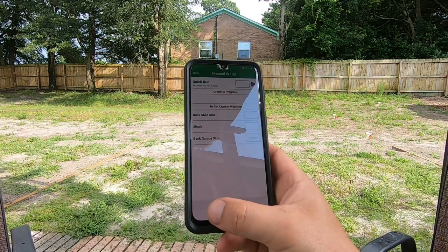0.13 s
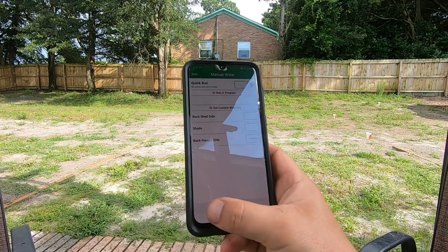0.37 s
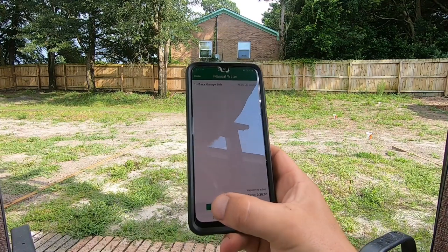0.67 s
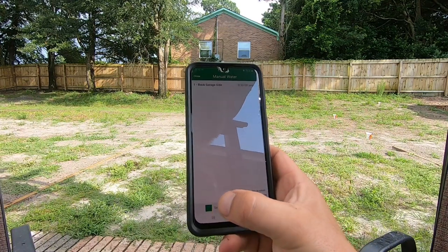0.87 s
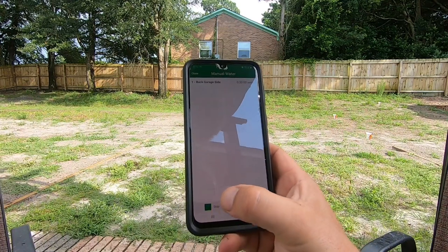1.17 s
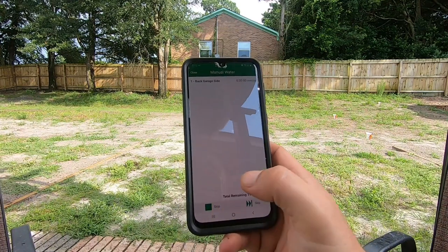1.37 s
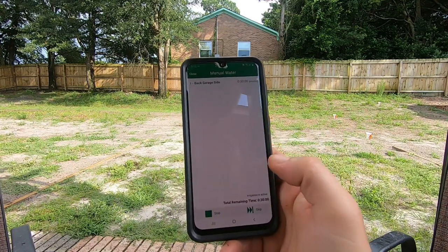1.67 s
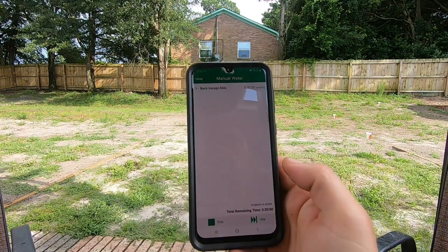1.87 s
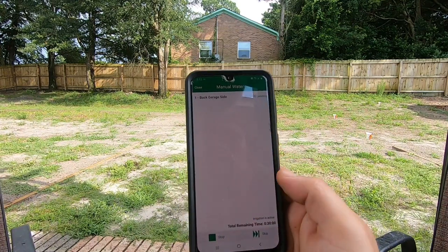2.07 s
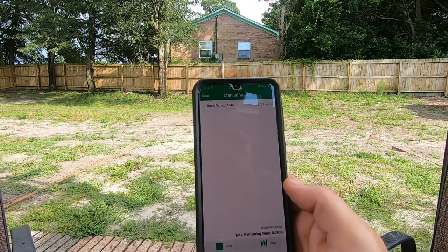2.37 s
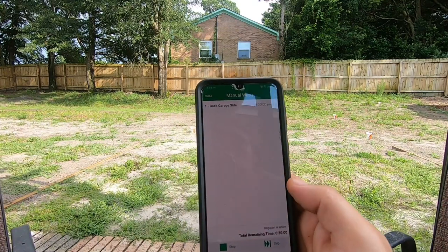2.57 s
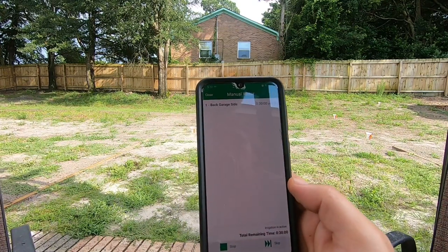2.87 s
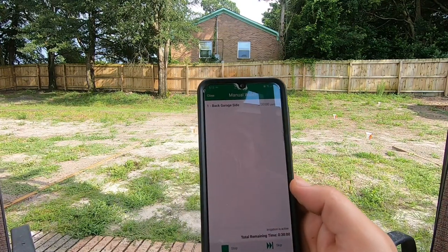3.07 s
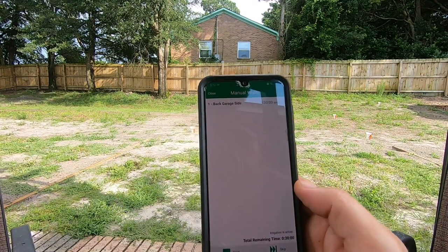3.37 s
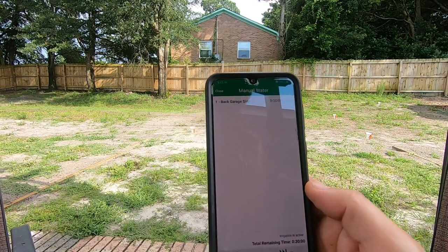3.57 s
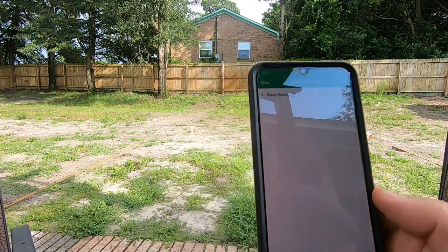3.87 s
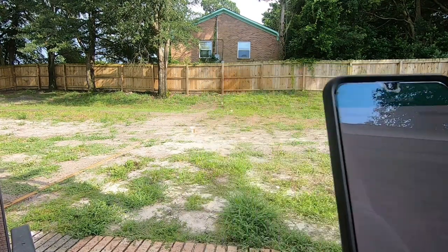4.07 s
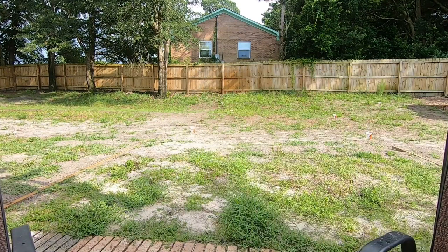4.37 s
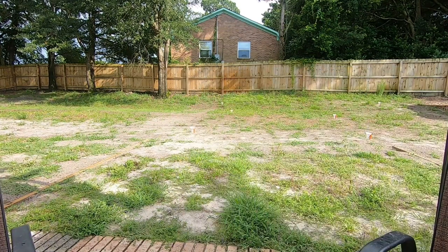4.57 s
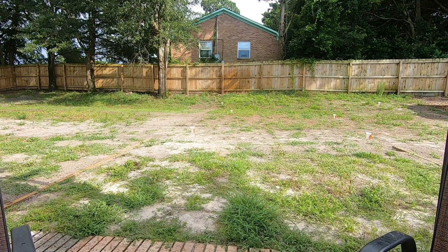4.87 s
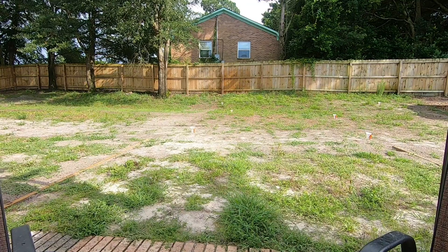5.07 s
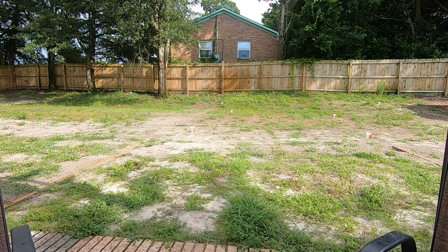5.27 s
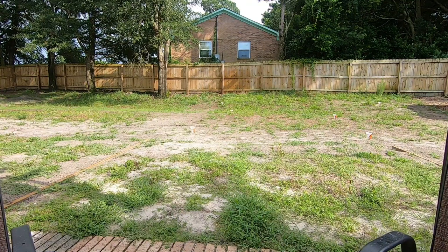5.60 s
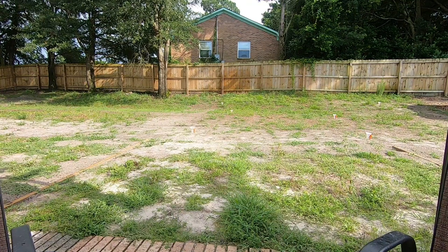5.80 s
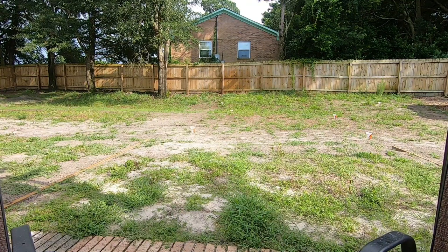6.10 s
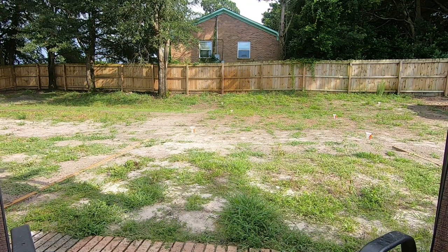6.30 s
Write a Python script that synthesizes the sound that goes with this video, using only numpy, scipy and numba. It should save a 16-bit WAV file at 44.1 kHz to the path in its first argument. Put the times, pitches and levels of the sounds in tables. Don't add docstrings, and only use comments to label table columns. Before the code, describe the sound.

Close handling sounds come first: a faint rustle, one dull knock and a tiny glassy tick. Around them lie distant motors, low road rumble, steady cicadas and slow air pushing the outdoor microphone. After a calm middle, the sprinkler line fills; airy spurts sputter from the heads with unsteady whistling, watery gulps and bright fizz, slightly echoed by fence and wall, still building when it stops.

```python
import sys
import numpy as np
from scipy import signal
from scipy.fft import rfft, irfft, next_fast_len
from scipy.io import wavfile
from scipy.ndimage import uniform_filter1d, map_coordinates
from numba import njit

SR = 44100
rng = np.random.default_rng(int(sys.argv[2]) if len(sys.argv) > 2 else 0)


def pcm_store(signal):
    levels = np.round(np.clip(np.atleast_2d(signal), -1, 1) * 32767)
    wavfile.write(sys.argv[1], SR, levels.astype(np.int16).T)


def elevation(decibels):
    levels = np.asarray(decibels, float)
    return 10 ** (levels / 20)


N = 284004

# (time [s], rumble level [dB])
TRAFFIC_LEVEL = [(0, -46), (.14, -45), (.45, -52), (.9, -47.5), (1.1, -48.5), (1.4, -47.5), (1.68, -46.5),
                 (2.1, -50), (2.5, -53), (3.5, -49), (4.09, -55), (4.6, -49.5), (5.26, -46), (5.55, -52),
                 (5.88, -45.5), (6.1, -51.5), (6.44, -48)]
# (frequency [Hz], density [dB per Hz])
TYRE_SPECTRUM = [(90, -15.5), (150, -8), (290, -12), (345, -18.5), (700, -17.5), (1100, -24), (2000, -33),
                 (3200, -41), (6000, -42)]
RUMBLE_SPECTRUM = [(18, -26), (28, -6), (45, 0), (70, -3.5), (95, -4.5), (140, -6.5), (220, -20.5)]
LEAF_SPECTRUM = [(800, -1), (2000, 0), (4000, -5.5), (6000, -7.5), (9500, -13), (11000, -11),
                 (15500, -12.5)]
TYRES_DB, TYRES_FOLLOW = -43.5, 0.14
# (time [s], level [dB])
HEAVE_LEVEL = [(0, -40), (.08, -17), (1, -19), (2, -24), (2.8, -18), (3.3, -18), (3.9, -13), (4.6, -16),
               (5.2, -21), (5.9, -14), (6.44, -24)]
# (frequency [Hz], density [dB per Hz])
HEAVE_SPECTRUM = [(.5, -12), (2.3, 0), (4.5, -13), (8, -17), (12, -27), (20, -38), (32, -52)]

# (frequency [Hz], level [dB])
FAN_LINES = [(147, -66.5), (294, -60), (441, -64)]
# (time [s], firing rate [Hz], firing level [dB], octave level [dB])
PULLING_ENGINE = [(0, 59.4, -32.5, -33.5), (.17, 60.4, -56, -28.5), (.42, 61.54, -34.5, -32.5),
                  (.56, 62.9, -35.5, -29), (.61, 64.8, -41, -51), (.68, 65.73, -37, -35.5),
                  (.95, 66.64, -54, -47.5), (1.12, 67.5, -40.5, -36.5), (1.42, 74.5, -45, -70)]
IDLING_ENGINE = [(1.9, 63.5, -52, -47.5), (2.05, 64.53, -55, -38.5), (2.62, 65.55, -42.5, -46.5),
                 (2.95, 66.5, -45, -48.5), (3.42, 67.1, -45, -47), (3.66, 65.4, -44, -44.5),
                 (3.85, 63, -42, -53), (4.05, 65, -45, -61), (4.38, 67.5, -49, -63)]
# (start [s], end [s], frequency [Hz], level [dB])
PASSING_MOTORS = [
    (1.606, 2.6, 122.4, -44.5),
    (4.95, 5.338, 120, -45),
    (5.703, 6.442, 120.6, -45.5),
]

# (start [s], level [dB])
SOLO_PULSES = [(.1, -50), (.4, -57), (.68, -47.5), (1.02, -50), (1.29, -50), (1.66, -50), (1.99, -47),
               (2.3, -50.5), (2.64, -52), (3.05, -49), (3.4, -52), (3.82, -50), (4.19, -45.5), (4.5, -56),
               (4.76, -50.5), (5.1, -52), (5.42, -52.5), (5.62, -61), (5.93, -56)]
GROUP_PULSES = [(.12, -52), (.45, -52), (.95, -51), (1.27, -51), (1.53, -50), (1.82, -48), (2.12, -52),
                (2.38, -53.5), (2.63, -50), (2.85, -49.5), (3.0, -52), (3.28, -50.5), (3.6, -54),
                (3.83, -51), (4.14, -53), (4.47, -54), (4.75, -52), (5.35, -54), (5.7, -63), (6.15, -57)]
# (frequency [Hz], density [dB per Hz])
CHOIR_SPECTRUM = [(4240, -51), (7200, 0.5), (7400, -0.5), (8670, 1.5), (9720, -8.5), (10500, -17),
                  (13600, -54), (22000, -120)]

# (time [s], level [dB])
RUSTLE_LEVEL = [(.12, -52.5), (.155, -54), (.18, -42.5), (.225, -48.5), (.256, -56), (.3, -54)]
# (frequency [Hz], density [dB per Hz])
CLOTH_SPECTRUM = [(400, -2.5), (800, -2.5), (1400, -8), (2000, -6.5), (3000, -16), (4600, -14.5),
                  (6000, -15), (8500, -16), (10500, -31)]
# (time [s], peak level [dB], frequency [Hz], t60 [s])
KNUCKLE = [
    (.183, -21, 797, 0.021),
    (0.196, -40, 940, 0.041),
]
# (time [s], peak level [dB])
NAIL_TICK = [
    (0.741, -27),
]
# (frequency [Hz], level [dB], t60 [s])
GLASS_MODES = [(6210, 8, 0.018), (5640, -2, 0.022), (5530, -12, 0.022)]

# (time [s], peak level [dB], length [s], dull part [dB])
PUFFS = [
    (4.178, -53, 0.0096, 13.5),
    (4.708, -45, 0.025, -4),
    (4.827, -42, 0.017, -2),
    (5.048, -39, .006, -3),
    (5.127, -49, 0.016, -7),
]
# (frequency [Hz], density [dB per Hz])
BRIGHT_SPECTRUM = [(3500, -1), (5000, 0), (9000, -11), (15500, -8)]
DULL_SPECTRUM = [(500, -13), (1200, 1), (3000, -11), (5000, -14), (7000, -25)]
# (delay [s], level [dB])
REFLECTIONS = [(.021, -13.5), (.047, -13.5), (.083, -21), (.12, -18)]

# (start [s], attack [s], hold [s], riser rush level [dB], fizz level [dB])
SPURTS = [(4.708, 0.022, 0.04, -49.5, -56), (4.785, 0.011, 0.033, -47.5, -60),
          (4.917, 0.013, 0.19, -44.5, -59), (5.069, 0.017, 0.12, -35.5, -49.5),
          (5.222, 0.0071, 0.089, -38.5, -54), (5.422, 0.023, .11, -41.5, -53.5),
          (5.605, 0.019, 0.12, -39.5, -53), (5.73, 0.076, 0.19, -39, -52.5),
          (5.895, 0.051, 0.16, -35.5, -51), (6.125, 0.028, 0.087, -35, -49.5),
          (6.29, 0.031, 0.12, -34.5, -50)]
# (near riser first mode [Hz], echo share [0-1],
# far riser first mode [Hz], far riser level [dB], whistle width [Hz])
RISER_COLUMNS = [(527, 0, 800, -20, 110), (541, 0.4, 790, -11, 60), (572, 0.76, 700, -20, 24),
                 (660, 0.5, 740, -0.5, 170), (595, 0.44, 550, -12, 110), (600, 0.4, 810, -6, 120),
                 (610, 0.35, 830, -9, 86), (614, 0.35, 884, 1, 84), (645, 0.1, 560, -5, 143),
                 (656, 0.3, 794, -4, 100), (647, 0.17, 540, -3, 94)]
# (low [Hz], low over the rush [dB], high [Hz], high over the rush [dB])
HEAD_CAVITIES = [(2616, -15, 3500, -8), (2644, -2, 3150, -1), (2306, -8, 2820, -11), (2583, -5.5, 2500, -4),
                 (2530, -3, 2700, -13), (2406, -4, 3460, -11), (2480, -3.5, 3080, -10),
                 (2435, -4, 3270, -2.5), (2630, -9, 3200, -6.5), (2605, -2.5, 3250, -4),
                 (2690, -9.5, 3330, -7)]
# (start [s], hold [s], level [dB], frequency [Hz])
WHISTLES = [(4.79, .02, -49, 1096), (4.915, 0.02, -34.5, 1163), (4.978, .05, -47, 1146),
            (5.072, 0.094, -37, 1309), (5.217, 0.099, -40.5, 1209), (5.341, 0.02, -63, 1196),
            (5.418, .05, -40, 1189), (5.494, 0.028, -46, 1196), (5.624, 0.021, -34.5, 1207),
            (5.669, 0.045, -41.5, 1250), (5.728, 0.079, -33.5, 1140), (5.793, 0.035, -28, 1213),
            (5.85, 0.033, -40, 1176), (5.894, 0.11, -32, 1263), (6.004, .05, -35.5, 1268),
            (6.144, .05, -34.5, 1290), (6.193, 0.029, -35, 1310), (6.246, .04, -41, 1295),
            (6.305, 0.034, -36, 1270), (6.323, 0.042, -26, 1300), (6.391, .05, -42, 1312)]
# (time [s], level [dB])
MIST_LEVEL = [(4.6, -78.5), (5, -64), (5.5, -61.5), (6.44, -57)]
# (frequency [Hz], density [dB per Hz])
NOZZLE_SPECTRUM = [(450, -14), (750, -7.5), (1200, -2.5), (1700, -2.5), (2100, -9), (2550, -5.5),
                   (3300, -6), (4200, -11), (5000, -23), (7000, -23)]
FIZZ_SPECTRUM = [(3500, -37), (5000, 4.5), (7000, -3), (9000, -10), (10500, -12), (15500, -23)]
DROPLET_SPECTRUM = [(5000, -25), (8000, 4), (11000, -3), (15500, -4)]
LEAK_DB, LEAK_WHISTLE_DB, LEAK_FIZZ_DB, LEAK_GROWS = -42, -38.5, -54, 2.9
# (time [s], peak level [dB], frequency [Hz], t60 [s])
BUBBLES = [
    (5.095, -47, 670, .1),
    (5.51, -40, 823, .2),
    (5.585, -31.5, 816, 0.12),
    (5.79, -33, 942, 0.11),
    (6.07, -36, 755, 0.11),
    (6.268, -35, 660, 0.13),
    (6.29, -29.5, 1108, 0.21),
    (6.36, -47, 1116, .2),
]


def unit(x):
    return x / np.sqrt(np.mean(np.abs(x) ** 2) + 1e-20)


def curves(rows):
    s, *cols = np.transpose(rows)
    return [np.interp(np.arange(N) / SR, s, c) for c in cols]


def span(rows, fade=.03):
    t = np.arange(N) / SR
    inside = np.minimum(t - rows[0][0], rows[-1][0] - t)
    return np.clip(inside / fade + 1, 0, 1)


def wobble(rate):
    knots = rng.standard_normal(int(N * rate / SR) + 4)
    return map_coordinates(knots, [np.arange(N) * rate / SR])


def coloured(x, spectrum):
    m = next_fast_len(N + 8192)
    f, v = np.transpose(spectrum)
    log_hz = np.log(np.fft.rfftfreq(m, 1 / SR) + 0.0042)
    db = np.interp(log_hz, np.log(f), v, -120, -120)
    return unit(irfft(rfft(x, m) * elevation(db), m)[:N])


def rush(spectrum, patchy_db):
    z = signal.stft(rng.standard_normal(N), nperseg=512)[2]
    field = uniform_filter1d(rng.standard_normal(z.shape), 6, 0)
    field = uniform_filter1d(field, 12, 1)
    patchy = signal.istft(z * elevation(patchy_db * unit(field)), nperseg=512)[1][:N]
    return coloured(patchy, spectrum)


def narrow(hz, width_hz, drive=1, steady=0, order=1):
    edge = signal.butter(order, np.clip(width_hz / SR, 1e-5, .5), output="sos")
    slow = signal.sosfilt(edge, drive * ([1, 1j] @ rng.standard_normal((2, N))))
    return unit(unit(slow) + steady) * np.exp(2j * np.pi * np.cumsum(hz) / SR)


def rings(events, rise, glide):
    out, t = np.zeros(N + SR), np.arange(SR // 5) / SR
    for s, db, hz, t60 in events:
        tone = np.sin(2 * np.pi * hz * t * (1 + 5 * glide * t))
        out[round(s * SR):][:len(t)] += elevation(db - 60 * t / t60) * tone * (1 - np.exp(-t / rise))
    return out[:N]


def bursts(start, hold, db, attack, sag, release):
    attack = np.c_[attack]
    age = np.arange(N) / SR - np.c_[start]
    fall_db = sag * np.clip(age - attack, 0, None) + release * np.clip(age - np.c_[hold], 0, None)
    gain = np.clip(age / attack, 0, 1) * elevation(np.c_[db] - fall_db)
    return np.sqrt(np.sum(gain ** 2, axis=0))


def yard():
    rumble_db, = curves(TRAFFIC_LEVEL)
    tyres_db = TYRES_DB + TYRES_FOLLOW * (rumble_db - rumble_db.mean())
    tyres = elevation(tyres_db + 1.0) * rush(TYRE_SPECTRUM, patchy_db=0.92)
    rumble = elevation(rumble_db + 6.5) * rush(RUMBLE_SPECTRUM, patchy_db=1.45)
    leaves = elevation(-52.5 + 0.094 * wobble(2.6)) * rush(LEAF_SPECTRUM, patchy_db=0.73)
    air = coloured(rng.standard_normal(N), HEAVE_SPECTRUM)
    power = np.abs(uniform_filter1d(air ** 2, size=SR // 2))
    air = air / np.sqrt(power + .1)
    return tyres + rumble + leaves + elevation(curves(HEAVE_LEVEL)[0]) * unit(air)


def engines():
    lines = [(1, np.full(N, hz), db) for hz, db in FAN_LINES]
    for rows in (PULLING_ENGINE, IDLING_ENGINE):
        hz, firing_db, octave_db = curves(rows)
        lines += [(span(rows, 0.073), hz, firing_db), (span(rows, 0.085), 2 * hz, octave_db)]
    for start, end, hz, db in PASSING_MOTORS:
        present = span([[start], [end]], 0.17)
        lines.append((present, hz * (1 + 0.01263 * wobble(4)), db + 0.89 * wobble(5.1)))
    return sum(on * elevation(db + 2.5) * narrow(hz, width_hz=2.2, steady=3.3).real for on, hz, db in lines)


def cicadas():
    click_hz = 115 * (1 + 0.088 * wobble(11))
    buzz = elevation(0.6 * np.sin(2 * np.pi * np.cumsum(click_hz) / SR) + 0.32 * wobble(35))
    near = elevation(-50) * narrow(np.full(N, 6656), width_hz=650, drive=buzz, order=4)
    for rows, hold_s, hz, width_hz in [(SOLO_PULSES, 0.1, 6526, 90), (GROUP_PULSES, 0.12, 6800, 320)]:
        start, db = np.transpose(rows)
        pulses = bursts(start, hold_s, db, attack=0.019, sag=0, release=150)
        near = near + pulses * narrow(np.full(N, hz), width_hz, drive=buzz, order=2)
    choir_db = -56 + 0.92 * wobble(28.07) + 0.64 * wobble(8)
    return near.real + elevation(choir_db) * rush(CHOIR_SPECTRUM, patchy_db=0)


def hand():
    rustle_db = curves(RUSTLE_LEVEL)[0] + 2.5 + 2.6 * wobble(250)
    rustle = elevation(rustle_db) * span(RUSTLE_LEVEL) * rush(CLOTH_SPECTRUM, patchy_db=2.0)
    modes = [(s, db + level - 5.0, hz, t60) for s, db in NAIL_TICK for hz, level, t60 in GLASS_MODES]
    tick = rings(modes, rise=0.00056, glide=0)
    return rustle + tick + rings(KNUCKLE, rise=0.0025, glide=0)


def pops():
    t = np.arange(N) / SR
    bright, dull = rush(BRIGHT_SPECTRUM, patchy_db=-3), rush(DULL_SPECTRUM, patchy_db=2.5)
    out = np.zeros(N)
    for s, db, life, dull_db in PUFFS:
        puff = np.exp(-((t - s - life / 2) / life) ** 2)
        out += elevation(db - 5.5) * puff * (bright + elevation(dull_db) * dull)
    return out


def yard_echo(x):
    return x + sum(elevation(db) * np.pad(x, (round(s * SR), 0))[:N] for s, db in REFLECTIONS)


@njit
def pipe(x, delay, echo):
    y = np.zeros(len(x))
    for n in range(len(x)):
        back = n - delay[n]
        k = int(back)
        y[n] = x[n]
        if k > 0:
            y[n] += echo[n] * (y[k] + (y[k + 1] - y[k]) * (back - k))
    return y


def riser(mode_hz, echo):
    sputter = elevation(0.91 * wobble(45))
    column = pipe(sputter * rng.standard_normal(N), SR / mode_hz, echo) * np.sqrt(1 - echo ** 2)
    return coloured(column, NOZZLE_SPECTRUM)


def head_cavities(now):
    low_hz, low_db, high_hz, high_db = np.array(HEAD_CAVITIES)[now].T
    low = narrow(low_hz * (1 + .01 * wobble(25)), width_hz=210, order=2)
    high = narrow(high_hz * (1 + .012 * wobble(20)), width_hz=280, order=2)
    return elevation(2.8 * wobble(70)) * (elevation(low_db) * low + elevation(high_db) * high).real


def nozzle_whistle(width_hz, leak):
    start, hold, db, tone_hz = np.transpose(WHISTLES)
    tone = bursts(start, hold, db, attack=0.02, sag=50, release=500)
    tone = np.hypot(tone, elevation(LEAK_WHISTLE_DB) * leak)
    hz = tone_hz[np.searchsorted(start[1:] * SR, np.arange(N))]
    hz = uniform_filter1d(hz, size=SR // 30)
    pure = narrow(hz * (1 + .01 * wobble(30)), width_hz=45, steady=.4, order=2)
    breathy = 0
    for ratio, level in [(.87, -10.5), (.96, -5.5), (1.03, -6), (1.1, -9), (1.22, -15)]:
        breathy = breathy + elevation(level + 3 * wobble(22)) * narrow(hz * ratio, width_hz=70, order=2)
    loose = np.clip(width_hz / 200, 0, 1)
    jet = np.sqrt(1 - loose) * pure + np.sqrt(loose) * breathy
    return elevation(4.0 + 1.5 * wobble(90)) * tone * (jet + elevation(-20) * jet ** 2).real


def sprinklers():
    start, attack, hold, rush_db, fizz_db = np.transpose(SPURTS)
    mist_db, = curves(MIST_LEVEL)
    leak = elevation(LEAK_GROWS * (mist_db - mist_db[-1]))
    flow = bursts(start, hold, rush_db, attack, sag=72, release=220)
    flow = np.hypot(flow, elevation(LEAK_DB) * leak)
    spray = bursts(start, hold, fizz_db, attack, sag=30, release=122)

    now = np.searchsorted(start[1:] * SR, np.arange(N))
    near_hz, share, far_hz, far_db, width_hz = np.array(RISER_COLUMNS)[now].T
    echo, far = np.clip(share, 0, .9), elevation(far_db)
    columns = (riser(near_hz, echo) + far * riser(far_hz, echo)) / np.sqrt(1 + far ** 2)
    air = flow * (elevation(1.0) * columns + head_cavities(now))
    whistle = nozzle_whistle(width_hz, leak)

    fizz = np.hypot(spray, elevation(LEAK_FIZZ_DB) * leak) * elevation(0.92 * wobble(53))
    fizz = fizz * rush(FIZZ_SPECTRUM, patchy_db=3.5)
    fizz += spray * rush(CHOIR_SPECTRUM, patchy_db=1)
    mist = span(MIST_LEVEL) * elevation(mist_db) * rush(DROPLET_SPECTRUM, patchy_db=2.0)
    return air + whistle + fizz + mist


def gulps():
    return rings(BUBBLES, rise=0.005, glide=0.074)


def scene():
    line = elevation(0.3) * yard_echo(pops() + sprinklers() + gulps())
    return (yard() + engines() + cicadas() + hand() + line)[None]


def top_cut(x):
    return signal.sosfilt(signal.butter(12, 15610, fs=SR, output="sos"), x)


def record(dry):
    return top_cut(dry)


dry = scene()
out = record(dry)
pcm_store(out)
```